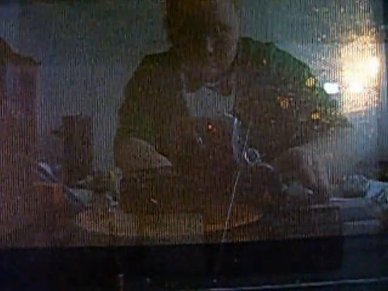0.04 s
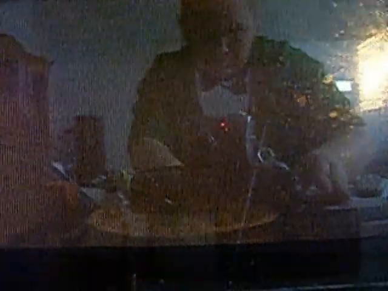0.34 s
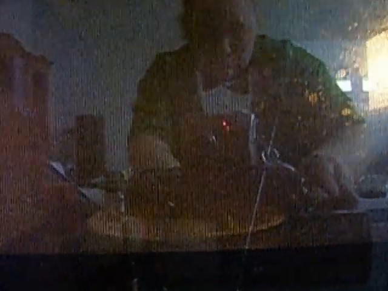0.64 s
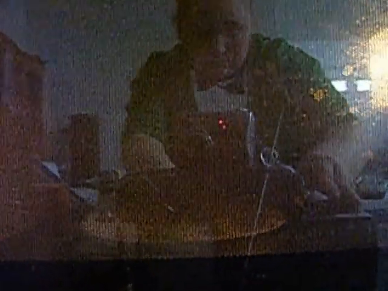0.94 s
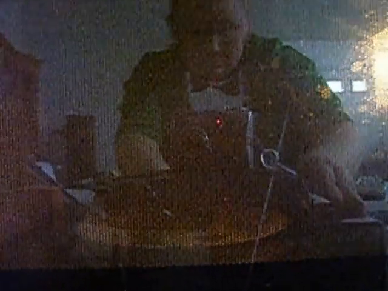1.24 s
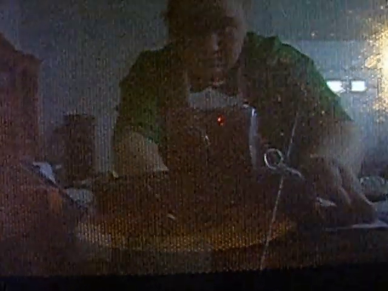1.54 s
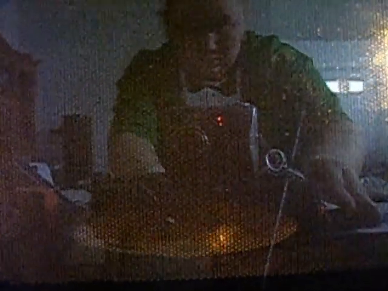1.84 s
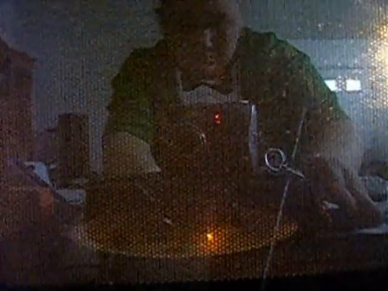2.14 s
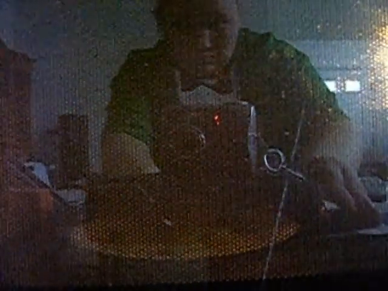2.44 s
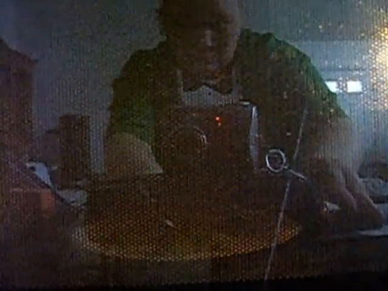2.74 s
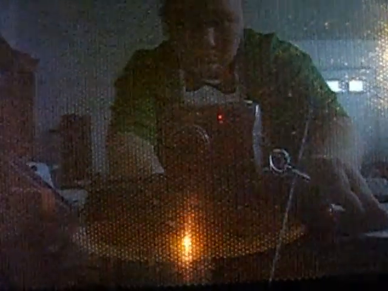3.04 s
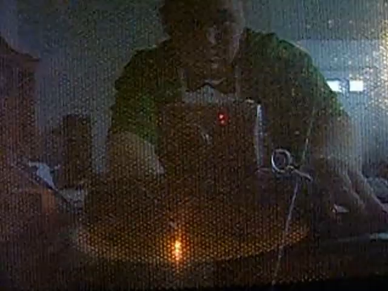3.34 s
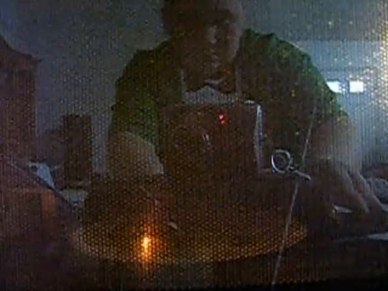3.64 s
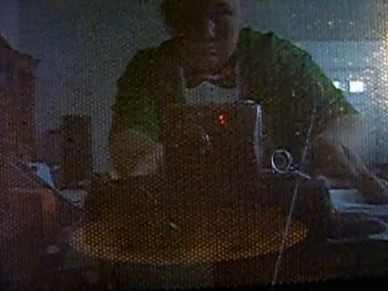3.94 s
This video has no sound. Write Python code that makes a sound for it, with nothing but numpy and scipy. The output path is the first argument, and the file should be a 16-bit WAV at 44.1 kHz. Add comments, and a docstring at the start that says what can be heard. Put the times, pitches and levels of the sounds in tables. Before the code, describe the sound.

A microwave oven runs throughout with a steady hum and fan whir, close and lo-fi. Small sparks tick at about 0.6 and 1.3 seconds. A faint sizzle follows as the drone dips slightly in pitch, and a soft electric hum swells around 2 seconds. From 3 seconds to the end at 4, louder arcing sputters in harsh, rapid buzzing bursts with a slight metallic ring.

```python
"""Arcing in a microwave oven

The fan drones and blows, and the transformer hums at harmonics of the mains. Something on the plate
sizzles, spits two sparks and glows briefly with a humming flame, then arcs in sputtering bursts that
excite the modes of the metal cavity. A small camera close by samples the sound at a low rate and
drops out for an instant once a second."""
import sys
import numpy as np
from scipy import signal
from scipy.fft import rfft, irfft
from scipy.io import wavfile
from scipy.ndimage import map_coordinates

SR = 44100
rng = np.random.default_rng(int(sys.argv[2]) if len(sys.argv) > 2 else 0)


def wav_out(sig):
    """Save sig, one row per channel (or a flat mono array), as 16-bit PCM at SR to the path in sys.argv[1]."""
    wavfile.write(sys.argv[1], SR, np.round(np.clip(np.atleast_2d(sig).T, -1, 1) * 32767).astype(np.int16))


N = 176400
T = np.arange(N) / SR
HZ = np.fft.rfftfreq(N, 1 / SR)
MAINS_HZ, CAMERA_RATE_HZ = 60.05, 8000
DRONE_ORDER = 8  # multiple of the fan's shaft frequency


def amp(db):
    """Amplitude ratio of a level in decibels."""
    return 10 ** (np.asarray(db) / 20)


def unit(x):
    """Normalisation to rms 1."""
    return x / np.sqrt(np.mean(x ** 2) + 1e-20)


def curve(points):
    """Linear interpolation of (time [s], value) points."""
    return np.interp(T, *np.transpose(points))


def colour(points):
    """Magnitude response through (frequency [Hz], gain [dB]) points, on a logarithmic frequency axis."""
    hz, db = np.transpose(points)
    return amp(np.interp(np.log(HZ + 1), np.log(hz), db))


def drift(rate_hz):
    """Low-pass noise: a slow random wander of rms 1."""
    return unit(irfft(rfft(rng.standard_normal(N)) / (1 + (HZ / rate_hz) ** 4), N))


def tone(cycles, db):
    """A sinusoid of random initial phase and given rms level."""
    return np.sqrt(2) * amp(db) * np.sin(2 * np.pi * (cycles + rng.random()))


def mains_harmonics(levels, waver_db):
    """A harmonic series on the mains frequency, each partial wavering in level."""
    return sum(tone(order * MAINS_HZ * T, db + waver_db * drift(rate_hz=4))
               for order, db in levels.items())


def cavity_response():
    """Standing waves between the metal walls raise resonance peaks over a flat response."""
    # cavity modes (frequency [Hz], bandwidth [Hz], peak gain [dB])
    modes = [(895, 22, 10), (1005, 30, 4), (1095, 30, 7), (1350, 40, 5), (1508, 25, 10), (1585, 45, 8),
             (1700, 25, 6), (1879, 12, 12), (2175, 16, 9), (2234, 16, 10), (2297, 20, 11), (2680, 30, 7),
             (2955, 35, 9), (3112, 22, 9)]
    return 1 + sum((amp(db) - 1) / (1 + 2j * (HZ - hz) / width) for hz, width, db in modes)


def in_cavity(source, spectrum):
    """Convolution with a unit-energy impulse response colours a discharge and rings the cavity modes."""
    response = colour(spectrum) * cavity_response() * (HZ < CAMERA_RATE_HZ / 2)
    lead = 256  # samples kept ahead of the impulse
    impulse = np.roll(irfft(response, N), lead)[:8192]
    return signal.fftconvolve(source, impulse / np.linalg.norm(impulse))[lead:][:N]


def fan(shaft_hz):
    """The fan drones at the eighth harmonic of its shaft; weaker ones swell near a cabinet resonance."""
    # level of the drone (time [s], level [dB])
    drone_db = [(0, -17.5), (.15, -16), (.33, -18.5), (.5, -17.3), (1.25, -16), (1.6, -16), (2, -16),
                (2.7, -18), (3.2, -16), (4, -17)]
    # weaker tones off resonance {multiple of the shaft frequency: level [dB]}
    shaft_harmonics = {4: -44.5, 5: -46.5, 7: -42, 9: -37.5, 10: -42.5, 12: -41, 13: -51.5, 16: -47.5, 20:
                       -47, 21: -45, 24: -52, 28: -58, 32: -59, 36: -57, 40: -47}
    panel_hz, panel_half_width_hz, panel_db = 575.8, 7.5, 11
    turns = np.cumsum(shaft_hz) / SR
    sound = tone(DRONE_ORDER * turns, curve(drone_db) + .6 * drift(rate_hz=7))
    for order, db in shaft_harmonics.items():
        detuning = (order * shaft_hz - panel_hz) / panel_half_width_hz
        lift_db = panel_db / (1 + detuning ** 2)
        cycles = order * turns + .052 * drift(rate_hz=7)
        sound += tone(cycles, db + lift_db + .82 * drift(rate_hz=7))
    return sound


def air(shaft_hz, level_db=-25.5, flutter_db=.65):
    """Turbulence makes broadband noise, lightly modulated by the turning fan and tinged by the cavity."""
    # spectrum of the airflow (frequency [Hz], relative level [dB])
    spectrum = [(25, -57), (60, -22.5), (110, -14.5), (200, -11), (270, -11.5), (340, 0.5), (440, 1),
                (560, -5.5), (750, -7.5), (1000, -7), (1220, -12.5), (1600, -12), (2000, -16.5),
                (2600, -22), (3150, -20.5), (3600, -22.5)]
    chop = 1 + .045 * np.sin(2 * np.pi * np.cumsum(shaft_hz) / SR)
    rush = rng.standard_normal(N) * chop * amp(flutter_db * drift(rate_hz=13))
    resonance = 1 + .04 * (cavity_response() - 1)
    response = colour(spectrum) * resonance * (HZ < CAMERA_RATE_HZ / 2)
    return amp(level_db) * unit(irfft(rfft(rush) * response, N))


def transformer():
    """Forced vibration: the transformer hums at multiples of the mains frequency."""
    # partials of the hum {multiple of the mains frequency: level [dB]}
    partials = {2: -47, 3: -44.5, 4: -37, 6: -29, 8: -48.5, 10: -39, 14: -55.5, 16: -50.5}
    return mains_harmonics(partials, waver_db=.36)


def sputter(per_s, spread_db=7):
    """Shot noise of rms 1: tiny discharges of random size, sign and moment."""
    sizes = amp(spread_db * np.clip(rng.standard_normal(N), -2, 2))
    signs = rng.choice([-1, 1], N)
    fires = rng.random(N) < per_s / SR
    return unit(sizes * signs * fires)


def sizzle(spark_decay_s=.0025):
    """The heating spot gives off faint shot noise and two sparks, noise bursts of exponential decay."""
    # fizz of the hot spot (time [s], level [dB])
    fizz_db = [(0, -66.5), (1.3, -41.5), (1.42, -43.5), (1.75, -44), (1.95, -40.5), (2.2, -42), (2.45, -48),
               (4, -49)]
    # lone sparks (time [s], level [dB])
    sparks = [(.6064, -21), (1.3437, -25)]
    # thin spectrum of both (frequency [Hz], relative level [dB])
    spectrum = [(500, -28.5), (1500, -17.5), (2300, -12), (2750, -3), (3300, -3.5), (3700, -2.5)]
    fizz = amp(curve(fizz_db)) * sputter(per_s=2500)
    spark_envelope = sum(amp(db) * (T >= start) * np.exp(-abs(T - start) / spark_decay_s)
                         for start, db in sparks)
    return in_cavity(fizz + spark_envelope * rng.standard_normal(N), spectrum)


def flame():
    """The burning arc hums at mains harmonics, amplitude-modulated by the size of its flame."""
    # partials at a gain of 0 dB {multiple of the mains frequency: level [dB]}
    partials = {2: -30.5, 3: -34.5, 5: -41, 7: -43, 8: -34, 9: -32.5, 12: -39, 15: -36, 25: -38.5}
    # size of the flame (time [s], gain [dB])
    size_db = [(0, -46), (1.66, -26.5), (1.76, -8), (1.95, -6), (2.13, -10.5), (2.24, -31), (2.98, -35),
               (3.15, -1), (3.2, -25), (3.28, -8), (3.37, 2.5), (3.43, -14), (3.47, 4), (3.51, -9),
               (3.58, 0.5), (3.73, 2.5), (3.92, -1), (4, -19)]
    return amp(curve(size_db)) * mains_harmonics(partials, waver_db=2.1)


def arc(level_db=-27.5, attack_s=.0013, release_s=.007):
    """Bursts of shot noise pulse twice per mains cycle; discharges that recur periodically buzz."""
    # bursts of arcing (start [s], end [s], gain at start [dB], gain at end [dB])
    bursts = [(3.010, 3.048, 0, -7), (3.064, 3.075, -2, 3), (3.083, 3.14, -5, -1), (3.135, 3.182, 5, -1.5),
              (3.243, 3.267, 5, -1), (3.271, 3.360, 0, 3.5), (3.355, 3.42, 2, 1), (3.452, 3.517, 3.5, 3.5),
              (3.53, 3.575, 4.5, 8.5), (3.577, 3.65, 8, 2), (3.661, 3.696, 6, 4), (3.690, 3.798, 1, 2.5),
              (3.784, 3.820, 2, 4), (3.826, 3.977, -2, 0)]
    # spectrum of the arc (frequency [Hz], relative level [dB])
    spectrum = [(100, -21), (350, 1), (600, -3.5), (1000, -2), (1230, -8.5), (1600, -5.5), (2300, -5),
                (2750, -8), (3200, -5.5), (3600, -5.5)]
    envelope = np.zeros(N)
    for start, end, first_db, last_db in bursts:
        gain = amp(np.interp(T, [start, end], [first_db, last_db]))
        attack = np.clip((T - start) / attack_s, 0, 1)
        release = np.exp(-np.maximum(T - end, 0) / release_s)
        envelope = np.maximum(envelope, gain * attack * release)
    mains_phase = 2 * np.pi * MAINS_HZ * T
    pulses = .5 + np.exp(-(np.sin(mains_phase) / (np.pi * .37)) ** 2)
    pulses *= 1 + .1 * np.cos(mains_phase)  # the two half cycles are unequal
    one_cycle = sputter(per_s=5000)[:round(SR / MAINS_HZ)]
    recurring_share = .18  # of the power
    recurring = np.sqrt(recurring_share) * unit(np.resize(one_cycle, N))
    irregular = np.sqrt(1 - recurring_share) * sputter(per_s=5000)
    return in_cavity(amp(level_db) * envelope * unit(pulses) * (recurring + irregular), spectrum)


def scene():
    """Superposition of the running oven and the discharges on the plate, in one channel."""
    # pitch of the drone, sagging as the oven takes up its load (time [s], frequency [Hz])
    drone_hz = [(0.1, 393), (1.16, 394.1), (1.73, 384.7), (3.9, 383.5)]
    shaft_hz = curve(drone_hz) / DRONE_ORDER
    return (fan(shaft_hz) + air(shaft_hz) + transformer() + sizzle() + flame() + arc())[None]


def record(dry):
    """Spectral imaging: straight lines between the camera's samples mirror the sound into the treble."""
    input_edge_hz, output_edge_hz = 3450, 15650
    first_drop_s, drop_s, drop_edge_s = .03744, .002, .0001
    from_drop_s = abs((T - first_drop_s + .5) % 1 - .5)  # one dropout a second
    gate = np.clip((from_drop_s - drop_s / 2) / drop_edge_s + .5, 0, 1)
    narrow = irfft(rfft(dry[0]) / np.sqrt(1 + (HZ / input_edge_hz) ** 40), N)
    sample_times = np.arange(0, N / SR, 1 / CAMERA_RATE_HZ)
    samples = map_coordinates(gate * narrow, [sample_times * SR], order=3, mode="nearest")
    joined = np.interp(T, sample_times, samples)
    low_pass = signal.firwin(511, output_edge_hz, window=("kaiser", 9), fs=SR)
    return signal.oaconvolve(joined, low_pass, "same")[None]


dry = scene()
out = record(dry)
wav_out(out)
```